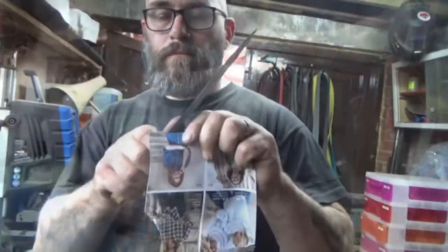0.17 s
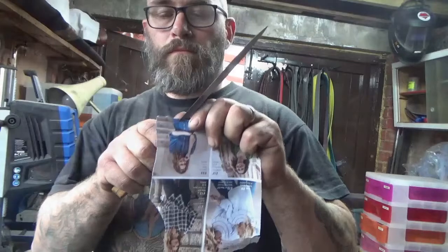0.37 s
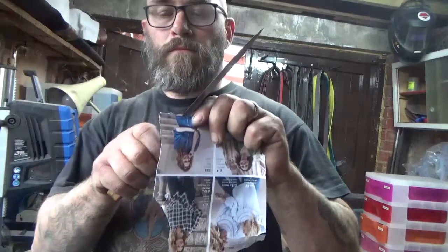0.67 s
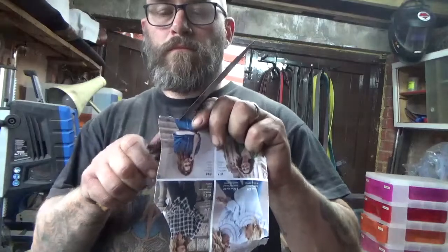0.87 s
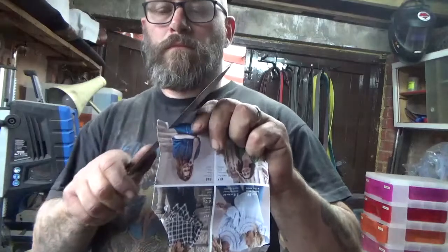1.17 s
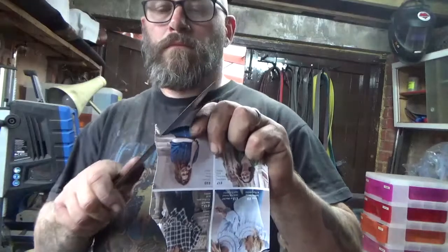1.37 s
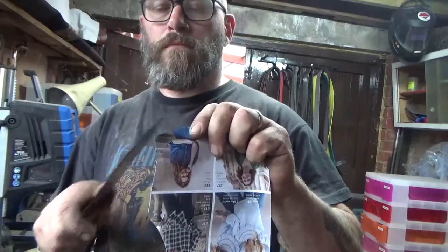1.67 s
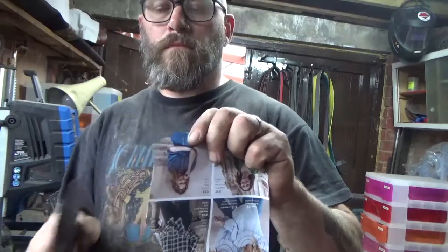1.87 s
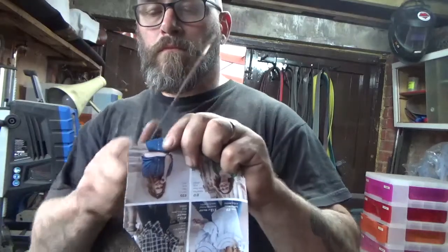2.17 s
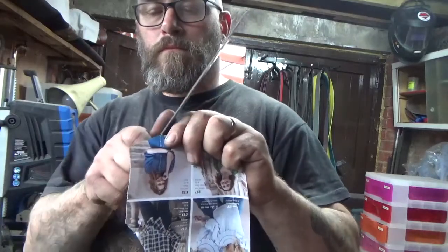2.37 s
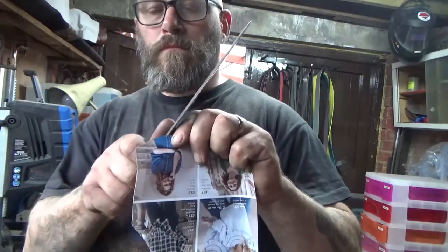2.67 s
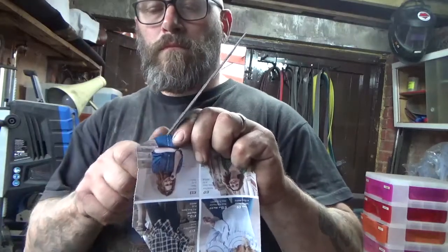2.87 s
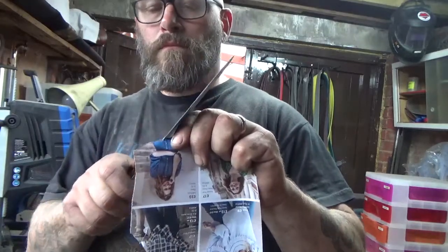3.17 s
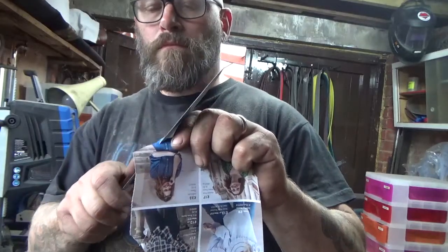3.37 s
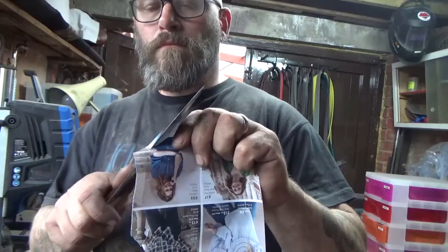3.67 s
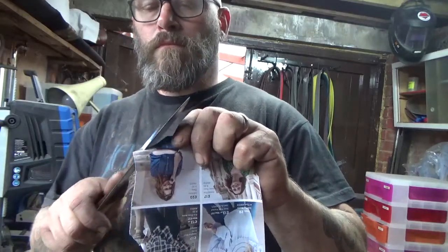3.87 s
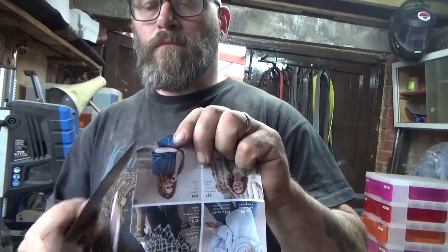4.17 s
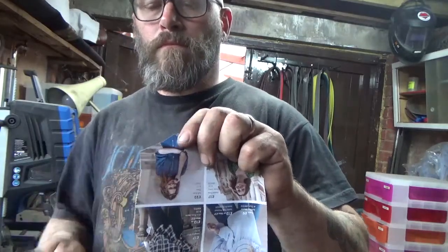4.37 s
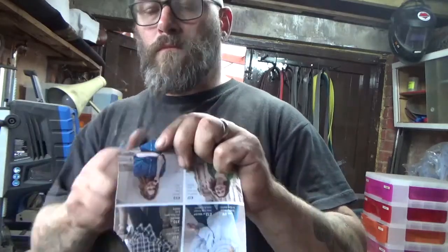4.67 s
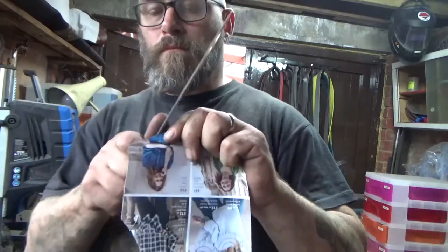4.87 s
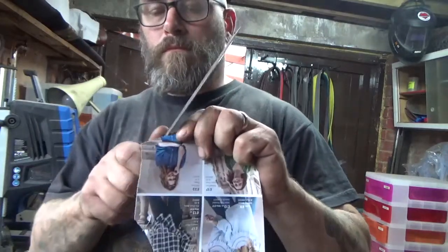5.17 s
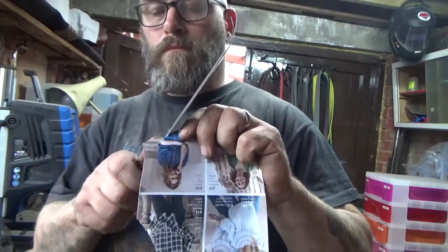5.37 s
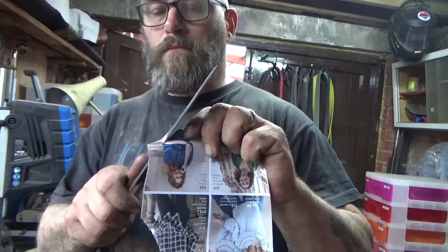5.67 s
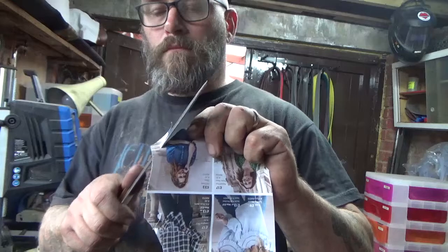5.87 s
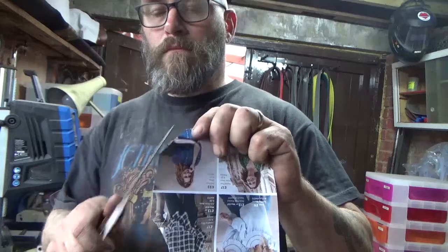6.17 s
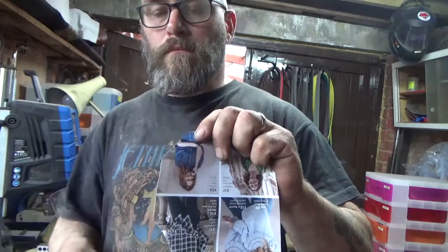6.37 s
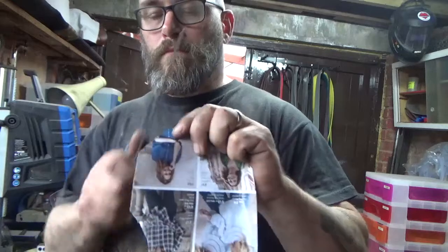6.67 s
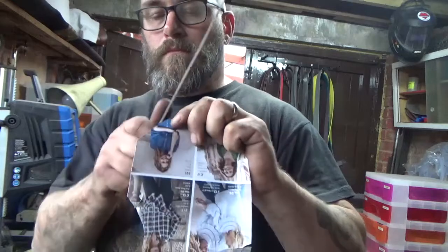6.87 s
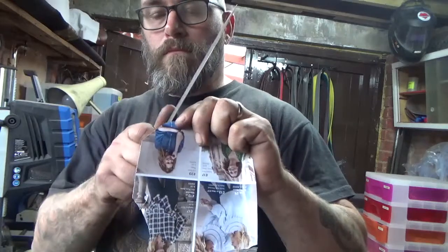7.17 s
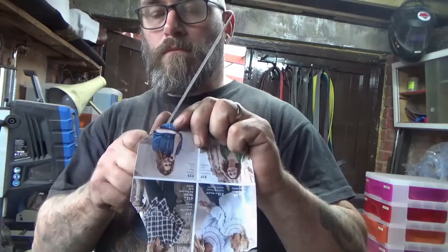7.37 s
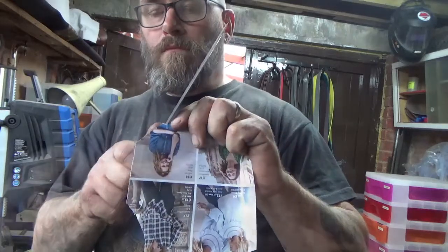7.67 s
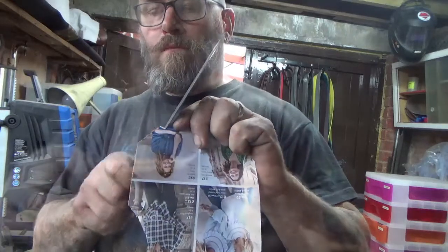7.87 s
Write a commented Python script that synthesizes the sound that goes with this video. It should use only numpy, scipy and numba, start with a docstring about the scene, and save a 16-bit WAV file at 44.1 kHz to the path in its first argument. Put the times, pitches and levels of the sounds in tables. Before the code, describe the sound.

A sharp knife slices slowly through a held sheet of glossy paper four times, each a dry bright crackling rip, in a small workshop.

```python
"""A freshly sharpened knife is drawn slowly through a sheet of glossy paper held up in a small shed, four cuts.
First the blade brushes and catches the paper, as before every cut: soft crackle and single clicks.
Then fibres part in a dense crackle that sets sheet and flap sounding; short squawks swell on single modes.
A faint drone comes and goes from late in the first cut into the second; the last cut runs to the end.
Rumble, hiss, a thin whine and faint regular ticks lie beneath; a small microphone pair lifts the treble."""
import sys
import numpy as np
from scipy import signal
from scipy.fft import rfft, irfft
from scipy.io import wavfile
from scipy.ndimage import uniform_filter1d
from numba import njit

SR = 44100
rng = np.random.default_rng(int(sys.argv[2]) if len(sys.argv) > 2 else 0)


def bounce(signal):
    """Save signal as a 16-bit WAV file at the path given by the first command-line argument."""
    frames = np.transpose(np.atleast_2d(signal))
    limited = np.clip(frames, -1, 1)
    pcm = np.round(limited * 32767).astype(np.int16)
    wavfile.write(sys.argv[1], SR, pcm)


N = 354123
STEP = 40   # samples between control values


SHEET_START_HZ, SHEET_END_HZ = 2250, 3000
FLAP_HZ, EDGE_HZ = 700, 7200
SHEET_WANDER, FLAP_WANDER, EDGE_WANDER, WANDER_PER_S = 0.04, 0.28, 0.053, 4   # shares of the pitch


def cutting():
    """The crackle reaches the treble directly and, below, sets the sheet and the cut flap sounding."""
    crackle_db, upper_db, sheet_db, flap_db, grit_db, progress = contacts()
    # the notes stray as the paper bends; the sheet's also climbs through each cut
    flap_hz = FLAP_HZ * np.exp(FLAP_WANDER * drift(WANDER_PER_S))
    edge_hz = EDGE_HZ * np.exp(EDGE_WANDER * drift(WANDER_PER_S))
    sheet_hz = SHEET_START_HZ + (SHEET_END_HZ - SHEET_START_HZ) * progress
    sheet_hz = sheet_hz * np.exp(SHEET_WANDER * drift(WANDER_PER_S))
    tear = tear_coloured(fibres(np.clip(grit_db, 0, 7)))

    treble = rms_one(treble_of(tear))
    treble = treble + from_db(-10.0) * bending(treble, 5700, 10700, count=12, share=0.03, patchy_db=3.5)
    edge = from_db(-6.5) * note(tear, edge_hz, 1100)
    treble = treble + edge + from_db(12.0) * resonance(treble, 6130, 540)
    upper = signal.filtfilt(*signal.butter(3, 8000, "high", fs=SR), treble)
    treble = rms_one(treble - upper) + from_db(upper_db) * rms_one(upper)

    sheet_modes = bending(tear, 1500, 5200, count=22, share=0.025, patchy_db=3.5)
    sheet = rms_one(band(tear, 1500, 5600)) + from_db(-5.0) * sheet_modes
    sheet = rms_one(sheet + from_db(-9.0) * note(tear, sheet_hz, 860))

    flap = bending(tear, 261, 1423, count=14, share=0.12, patchy_db=7.0)
    flap = flap + from_db(-2.5) * rms_one(band(tear, 197, 1130))
    flap = rms_one(flap + from_db(-4.0) * note(tear, flap_hz, 180))
    mix = treble - from_db(sheet_db) * sheet + from_db(flap_db) * flap
    return from_db(crackle_db) * mix + squawks(tear)


# edge in the paper, one table per cut: (time [s], crackle level [dB], upper treble [dB re lower treble],
# sheet [dB re crackle], flap [dB re crackle])
CUT_CURVES = [
    [(0.6, -59, 5, -7, -7), (0.62, -48.5, -2, -9, -22), (0.68, -35.5, 2.5, -7.5, -22),
     (0.796, -29, -0.5, -5.5, -33), (1.114, -29, 3, -2, -12), (1.386, -27, 3, -7.5, -24.5),
     (1.422, -25.5, 9, -6.5, -28), (1.432, -26, 9, -3.5, -18.5), (1.548, -22.5, -6.5, -13, -20.5),
     (1.578, -19.5, -5, -13.5, -22), (1.61, -34, -8, -9.5, -19), (1.698, -49, 2, -10.5, -14),
     (1.72, -67, -5, -9, 0)],
    [(2.665, -41, 8, -3, -22), (2.695, -38, 4, -3.5, -18.5), (3.005, -27, 1, -6.5, -18.5),
     (3.059, -29.5, 3, -10.5, -31), (3.147, -34, 6, -7.5, -22.5), (3.283, -26, -3, -10, -16.5),
     (3.455, -34, 3, -6, -17), (3.593, -22.5, -3, -10.5, -21), (3.747, -27, 1.5, -8.5, -19),
     (4.065, -21.5, -9, -10, -27), (4.171, -28, 0.5, -5.5, -14), (4.261, -58, -11, -9, -12),
     (4.3, -75, -6, -5, 14)],
    [(5.03, -55, -9, -4, -12), (5.064, -36, -6, -13, -22), (5.118, -34, 0, -9.5, -25),
     (5.226, -27, -3, -11, -19.5), (5.408, -28, -5.5, -11.5, -22.5), (5.44, -30, -5, -10.5, -19),
     (5.534, -27, -0.5, -7, -13.5), (5.682, -29.5, 6, -6, -13), (5.726, -26.5, 4.5, -8.5, -18),
     (6.142, -19, -7, -15.5, -18.5), (6.172, -29.5, -8, -10, -12), (6.2, -35.5, -7, -11, -29),
     (6.27, -68.5, -14, -9, 13)],
    [(7.525, -44, 1, -3, -15), (7.529, -43.5, 4, -4, -20), (7.579, -36, 3, -17, -22),
     (7.589, -32, 2, -15, -22), (7.619, -26.5, -8.5, -11.5, -25.5), (7.867, -30.5, 4.5, -12, -22.5),
     (7.911, -19.5, -12.5, -21, -29), (8.03, -26, 1, -10, -22)],
]
# spread of the fibre sizes, one row per cut: (at the start [dB], at the end [dB])
CUT_GRIT = [(5, 5.5), (4.5, 5.5), (4, 5), (6.5, 5)]
# blade brushing the sheet without cutting: (time [s], hold [s], crackle level [dB],
# droop over the hold [dB], fade after it [dB/s], sheet [dB re crackle])
BRUSHES = [(0.0, .385, -43.5, 4.5, 1200, -10.5), (0.332, 0.032, -38.5, 3, 300, -8),
           (0.458, 0.075, -30.5, 8, 310, -8.5), (2.547, 0.0059, -36.5, -0.5, 700, -5.5),
           (2.589, 0.04, -43, -5.5, 600, -4.5), (4.879, 0.074, -41.5, -6, 450, -10.5),
           (6.547, 0.007, -43, 1, 450, -0.5), (7.158, 0.49, -40.5, 5.5, 900, -13)]
BRUSH_ATTACK_S, BRUSH_GRIT_DB = 0.0027, 4
BRUSH_UPPER_DB, BRUSH_FLAP_DB = -1.5, -23


def contacts():
    """Levels, grit and progress (0-1) of the edge, sample by sample; silent between contacts."""
    t = np.arange(N) / SR
    idle = [-150, BRUSH_UPPER_DB, 0, BRUSH_FLAP_DB, BRUSH_GRIT_DB, 0]
    controls = np.outer(idle, np.ones(N))
    for s, hold_s, level_db, droop_db, fade_db_per_s, sheet_db in BRUSHES:
        rise_db = 20 * np.log10(np.clip((t - s) / BRUSH_ATTACK_S, 1e-6, 1))
        fade_db = fade_db_per_s * np.maximum(t - s - hold_s, 0)
        shape_db = rise_db - droop_db * (t - s) / hold_s - fade_db
        controls[0] = np.maximum(controls[0], np.where(t < s, -150, level_db + shape_db))
        controls[2, t >= s] = sheet_db
    for cut, (first_db, last_db) in zip(CUT_CURVES, CUT_GRIT):
        s, *columns = np.transpose(cut)
        at = (t >= s[0]) & (t <= s[-1])
        progress = (t[at] - s[0]) / (s[-1] - s[0])
        grit_db = first_db + (last_db - first_db) * progress
        controls[:, at] = [np.interp(t[at], s, c) for c in columns] + [grit_db, progress]
    return controls


FIBRES_PER_S = 5000   # median rate


def fibres(grit_db):
    """Fibres part at random, in clumps; the grittier the edge bites, the more a few big ones stand out."""
    born = rng.random(N) < FIBRES_PER_S * from_db(3.0 * drift(150)) / SR
    sizes = from_db(grit_db * np.minimum(rng.exponential(1, N), 4.5)) * rng.choice([-1, 1], N)
    clicks = born * sizes + 0.76 * rng.standard_normal(N)
    power = uniform_filter1d(clicks ** 2, size=3000)
    # the hand's pull, not the grit, sets the power
    return clicks / np.sqrt(power) * from_db(0.77 * drift(12.3))


# colour of tearing paper: (frequency [Hz], relative level [dB])
TEAR_COLOUR = [(120, -78), (200, -27), (330, -13.5), (411, -16.5), (485, -8), (725, -14.5), (1260, -15),
               (1540, -17.5), (2380, -14.5), (2810, -16.5), (3160, -13), (4800, -17.5), (6070, -18),
               (7170, -6), (10900, -2.5), (14200, -13), (22000, -120)]


def tear_coloured(x):
    """Clicks take on the spectrum of tearing paper."""
    return coloured(x, lambda hz: from_db(at_hz(TEAR_COLOUR, hz)))


def treble_of(x):
    """The torn-paper colour above the sheet's range."""
    return signal.sosfilt(signal.butter(9, 5550, "high", fs=SR, output="sos"), x)


# sheet singing on one mode: (time [s], length [s], centre [Hz], width [Hz], level under the swell [dB])
SQUAWKS = [(0.955, 0.3, 2240, 496, -37), (1.237, 0.2, 500, 60, -47.5), (1.44, 0.044, 328, 40, -42),
           (2.806, 0.18, 2250, 700, -43), (2.992, 0.046, 2180, 500, -28), (3.86, 0.3, 510, 102, -43.5),
           (5.2, 0.18, 1214, 150, -45), (5.774, 0.13, 510, 120, -47.5), (6.024, 0.21, 863, 205, -35.5),
           (7.535, 0.068, 3000, 1290, -36)]


def squawks(tear):
    """The crackle through one strong mode, under a smooth swell."""
    out = np.zeros(N)
    for s, length_s, hz, width_hz, level_db in SQUAWKS:
        at, swell = round(s * SR), np.hanning(round(length_s * SR))
        sung = resonance(tear[at:at + len(swell)], hz, width_hz)
        sung = rms_one(resonance(sung, hz, width_hz))
        out[at:at + len(swell)] += from_db(level_db) * swell * sung
    return out


# edge catching or touching the sheet: (time [s], click drive [dB], sheet drive [dB re click drive])
SNAPS = [(0.5112, -33, -20), (0.828, -7, -24), (0.891, -3.5, -25), (0.9162, -9, -34), (0.9382, -5.5, -22),
         (1.0707, -2, -23.5), (1.1954, -18, -18), (1.4375, -8, -26), (1.4836, -5, -27), (1.5763, -4, -27),
         (2.552, -11.5, -20.5), (2.7265, -6.5, -25), (2.989, -7, -23), (3.189, -11, -37), (3.2107, -7, -22),
         (4.1778, -4.5, -22), (4.333, -36, -4), (4.885, -21, -24), (4.908, -12, -20), (5.0382, -26, -19),
         (5.0608, -27, -25), (5.275, -8, -22), (6.549, -18, -19.5), (7.0785, -31, -4.5), (7.0916, -36, -18),
         (7.1246, -34, -24), (7.152, -16, -38), (7.2438, -18, -35), (7.3517, -21, -24), (7.3638, -10, -29),
         (7.3943, -12, -23), (7.421, -19, -23), (7.4546, -19, -23), (7.528, -12, -31), (7.5357, -12, -26),
         (7.5524, -14.5, -20), (7.565, -7, -31), (7.587, -6, -32), (7.5948, -6, -35), (7.607, -4, -29),
         (7.6264, -5, -29), (7.6527, -6, -25.5), (7.679, -4, -27), (7.692, -8, -23), (7.836, -5.5, -27),
         (7.8864, -3, -36)]
SNAP_T60_S, RUSTLE_DB = 0.014, -21.5   # rustle re click


def snaps():
    """A sharp click and a short rustle dying after it; the sheet answers below."""
    t = np.arange(4000) / SR
    treble, sheet = np.zeros(N + len(t)), np.zeros(N + len(t))
    noise = rng.standard_normal((len(SNAPS), len(t)))
    for (s, click_db, sheet_db), rustle in zip(SNAPS, noise):
        shape = rustle * from_db(RUSTLE_DB - 60 * t / SNAP_T60_S)
        shape[0] = np.sign(rustle[0])   # the click
        at = round(s * SR)
        treble[at:at + len(t)] += from_db(click_db) * shape
        sheet[at:at + len(t)] += from_db(click_db + sheet_db) * shape
    bright = treble_of(tear_coloured(treble[:N]))
    bright = bright + from_db(13.5) * resonance(bright, PORT_HZ, 910)
    return from_db(13.0) * bright + from_db(20.0) * band(sheet[:N], 570, 7400)


def bending(x, low_hz, high_hz, count, share, patchy_db):
    """The free paper has many narrow modes that wander and come and go as it bends; rms 1."""
    centres_hz = np.geomspace(low_hz, high_hz, count)
    hz = centres_hz[:, None] * (1 + 0.05 * slow(1.09, count))
    signs = (-1.) ** np.arange(count)[:, None]
    gain = from_db(patchy_db * slow(5.8, count)) * signs
    return rms_one(gliding(x, hz, share * centres_hz, gain, STEP, SR))


def note(x, note_hz, width_hz):
    """One strong mode whose pitch moves with note_hz; rms 1."""
    hz = np.clip(note_hz[None, ::STEP], 100, 10000)
    return rms_one(gliding(x, hz, np.array([float(width_hz)]), np.ones_like(hz), STEP, SR))


@njit
def gliding(x, hz, width_hz, gain, step, sr):
    """Sum of two-pole resonances whose centres and strengths move (rows = modes, one value each step)."""
    out = np.zeros(len(x))
    for k in range(hz.shape[0]):
        r = np.exp(-np.pi * width_hz[k] / sr)
        y1, y2, b, c = 0., 0., 0., 0.
        for i in range(2, len(x)):
            if i % step == 2:
                b = gain[k, i // step] * (1 - r * r) / 2
                c = 2 * r * np.cos(2 * np.pi * hz[k, i // step] / sr)
            y1, y2 = b * (x[i] - x[i - 2]) + c * y1 - r * r * y2, y1
            out[i] += y1
    return out


# wall echoes: (frequency [Hz], level [dB re direct])
ECHO_COLOUR = [(200, 1), (600, -4.5), (2500, -8.5), (6000, -14.5), (11000, -14)]
SHED_T60_S = 0.05


def shed(x):
    """Dense echoes off cluttered walls, other ones at each microphone."""
    t = np.arange(int(0.4 * SR)) / SR
    tails = rng.standard_normal((2, len(t))) * from_db(-60 * t / SHED_T60_S) * (t > 0.003)
    sent = coloured(x, lambda hz: from_db(at_hz(ECHO_COLOUR, hz)))
    return np.array([signal.fftconvolve(sent, tail / np.linalg.norm(tail))[:N] for tail in tails])


# background colour: (frequency [Hz], relative level [dB])
AIR_COLOUR = [(15, -40), (25, -27), (54, 2.5), (71, -2.5), (91, -9), (141, -9.5), (182, -13.5), (266, -12),
              (478, -14.5), (1350, -21.5), (1460, -25), (2140, -25.5), (3220, -30), (6070, -28),
              (10900, -31.5), (14200, -68), (22000, -120)]
# (frequency [Hz], left-right likeness [0-1])
AIR_LIKENESS = [(60, 0.97), (170, 0.84), (490, 0.91), (1420, 0.85), (4060, 0.78), (11700, 0.79)]
# (frequency [Hz], left minus right [dB])
AIR_BALANCE = [(60, 0.5), (170, 3.5), (490, 0.5), (1420, -0.5), (4060, 0), (11700, 0.5)]
AIR_DB = -51
PORT_HZ, PORT_WIDTH_HZ, PORT_DB = 6230, 560, 0.5   # microphone port; level of the added resonance


def rumble_and_hiss():
    """Coloured noise, partly alike in both channels; hiss gathers at the microphone port's resonance."""
    white = rng.standard_normal((2, N))

    def alike(hz):
        return np.clip(at_hz(AIR_LIKENESS, hz), 0, 0.999)

    mid = coloured(white[0], lambda hz: from_db(at_hz(AIR_COLOUR, hz)) * np.sqrt(1 + alike(hz)))
    side = coloured(white[1], lambda hz: from_db(at_hz(AIR_COLOUR, hz)) * np.sqrt(1 - alike(hz)))
    air = balanced([mid + side, mid - side], AIR_BALANCE)
    air = air + from_db(PORT_DB) * resonance(air, PORT_HZ, PORT_WIDTH_HZ)
    return rms_one(air) * from_db(AIR_DB)


# (time [s], mean level [dB])
DRONE_CURVE = [(1.64, -80), (1.76, -57), (2.3, -59), (2.9, -64), (3.2, -80)]
DRONE_HZ, DRONE_WAVER_DB = 139, 2.5


def drone():
    """A steady sine, its level slowly wavering."""
    tone = np.sqrt(2) * np.sin(2 * np.pi * DRONE_HZ * np.arange(N) / SR)
    return tone * from_db(in_time(DRONE_CURVE) + DRONE_WAVER_DB * drift(4.9))


WHINE_HZ, WHINE_WIDTH_HZ, WHINE_DB = 2112, 6.2, -79


def whine():
    """Noise through one very narrow resonance."""
    return rms_one(resonance(rng.standard_normal(N), WHINE_HZ, WHINE_WIDTH_HZ)) * from_db(WHINE_DB)


# levels of four ticks in turn, repeated: mean level [dB]
TICK_LEVELS = [-56.5, -65, -56, -60]
TICK_SPREAD_DB = 2
TICK_FIRST_S, TICK_END_S, TICK_GAP_S = 0.1384, 7.95, 0.04003
TICK_HZ, TICK_FALL_HZ, TICK_S = 3180, 895, 0.0071


def ticking():
    """Each tick is a short sine falling in pitch under a smooth swell."""
    out, t = np.zeros(N), np.arange(int(TICK_S * SR)) / SR
    cycles = TICK_HZ * t - TICK_FALL_HZ * t ** 2 / TICK_S / 2
    chirp = np.sin(2 * np.pi * cycles) * np.hanning(len(t))
    spread = rng.standard_normal(200)
    for k, s in enumerate(np.arange(TICK_FIRST_S, TICK_END_S, TICK_GAP_S)):
        level_db = TICK_LEVELS[k % len(TICK_LEVELS)] + TICK_SPREAD_DB * spread[k]
        out[round(s * SR):][:len(t)] += from_db(level_db) * chirp
    return out


def from_db(db):
    """Gain of a level in dB."""
    return 10 ** (np.asarray(db) / 20)


def rms_one(x):
    """Scaled to rms 1."""
    return x / np.sqrt(np.mean(x ** 2) + 1e-20)


def in_time(rows):
    """The second column of a curve table, sample by sample."""
    return np.interp(np.arange(N) / SR, *np.transpose(rows))


def at_hz(points, hz):
    """A spectrum read on a log-frequency axis."""
    points_hz, values = np.transpose(points)
    return np.interp(np.log(hz), np.log(points_hz), values)


def slow(rate, count):
    """Rows of slow chance of spread 1, changing about rate times a second, one value each STEP."""
    r = np.exp(-2 * np.pi * STEP * rate / SR)
    white = rng.standard_normal((count, N // STEP + 2002))
    rows = signal.lfilter([1], [1, -2 * r, r * r], white)[:, 2000:]   # settled part
    return rows / np.std(rows, axis=1, keepdims=True)


def drift(rate):
    """Slow chance, sample by sample."""
    row = slow(rate, count=1)[0]
    return np.interp(np.arange(N) / STEP, np.arange(len(row)), row)


def coloured(x, gain):
    """x through a causal filter whose gain is a function of Hz (minimum phase, from the folded cepstrum)."""
    hz = np.maximum(np.fft.rfftfreq(4096, 1 / SR), 1)
    cepstrum = irfft(np.log(gain(hz) + 1e-9))
    cepstrum[1:2048] *= 2
    cepstrum[2049:] = 0
    return signal.oaconvolve(x, irfft(np.exp(rfft(cepstrum))))[:N]


def resonance(x, hz, width_hz):
    """Two-pole resonance of gain 1 on top."""
    r = np.exp(-np.pi * width_hz / SR)
    feed = np.array([1, 0, -1]) * (1 - r * r) / 2
    return signal.lfilter(feed, [1, -2 * r * np.cos(2 * np.pi * hz / SR), r * r], x)


def band(x, low_hz, high_hz):
    """Band-pass."""
    return signal.sosfilt(signal.butter(2, [low_hz, high_hz], "band", fs=SR, output="sos"), x)


def balanced(pair, balance):
    """Left and right tilted against each other by a balance spectrum."""
    return np.array([coloured(x, lambda hz: from_db(side * at_hz(balance, hz) / 2))
                     for x, side in zip(pair, (1, -1))])


# direct sound: (frequency [Hz], left minus right [dB])
CUT_BALANCE = [(60, -2), (170, 13), (490, 0.5), (1420, 0.5), (4060, 0), (11700, 0.5)]


def scene():
    """The cut stands close in front of the microphones."""
    paper = cutting() + snaps()
    near = balanced([paper, paper], CUT_BALANCE)
    background = rumble_and_hiss() + drone() + whine()
    return near + shed(paper) + background + ticking()


CUTOFF_HZ = 11010


def record(dry):
    """Peaks are rounded, the top is cut steeply."""
    rounded = 0.9 * np.tanh(dry / 0.9)
    return signal.sosfilt(signal.ellip(14, 0.5, 60, CUTOFF_HZ, fs=SR, output="sos"), rounded)


dry = scene()
out = record(dry)
bounce(out)
```